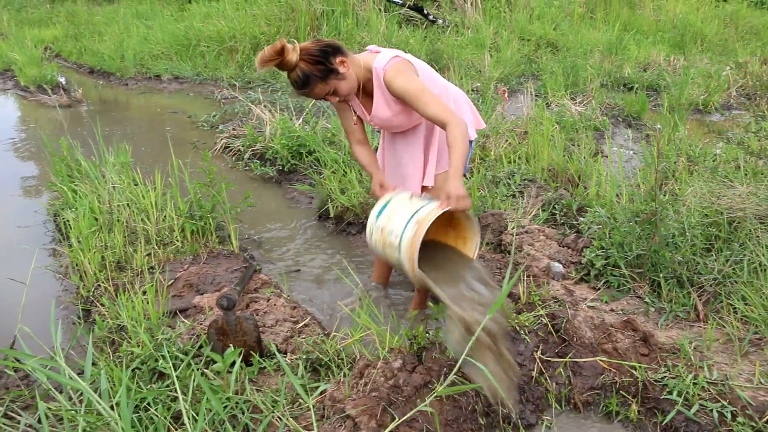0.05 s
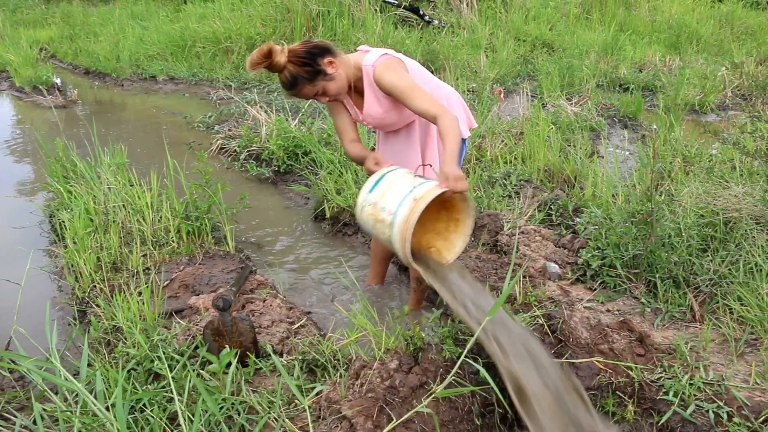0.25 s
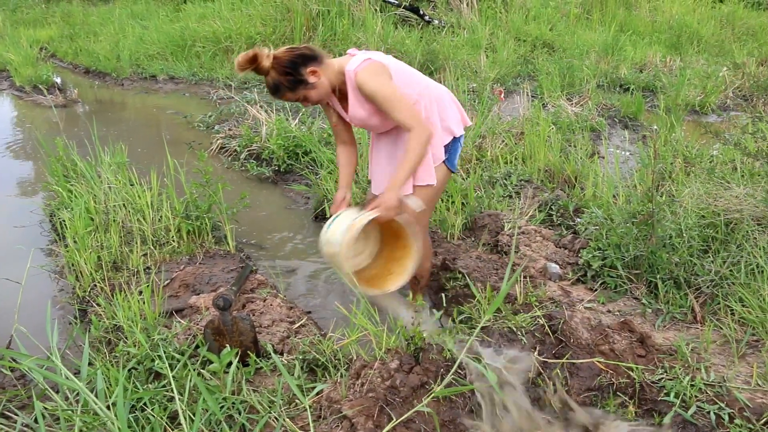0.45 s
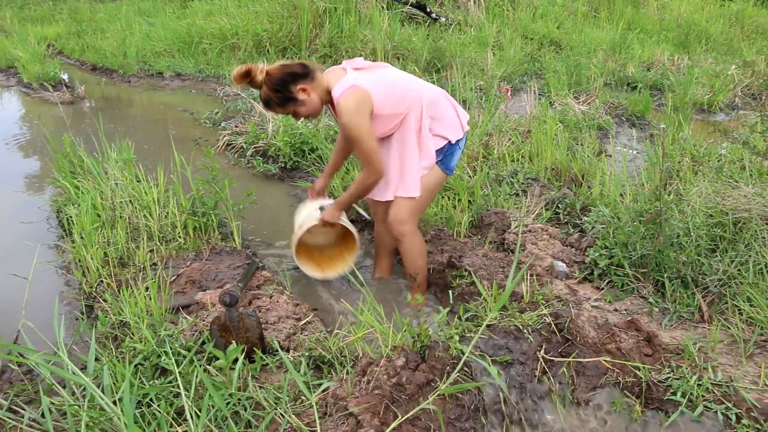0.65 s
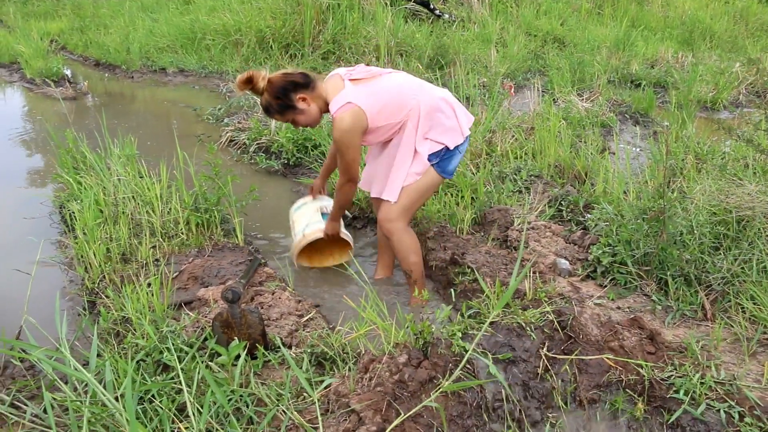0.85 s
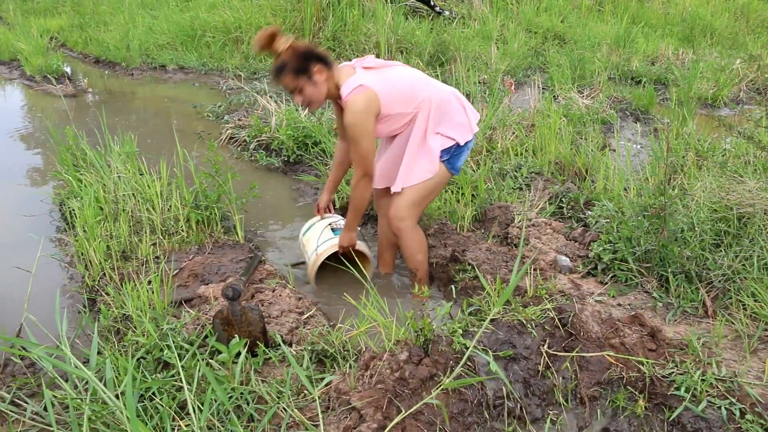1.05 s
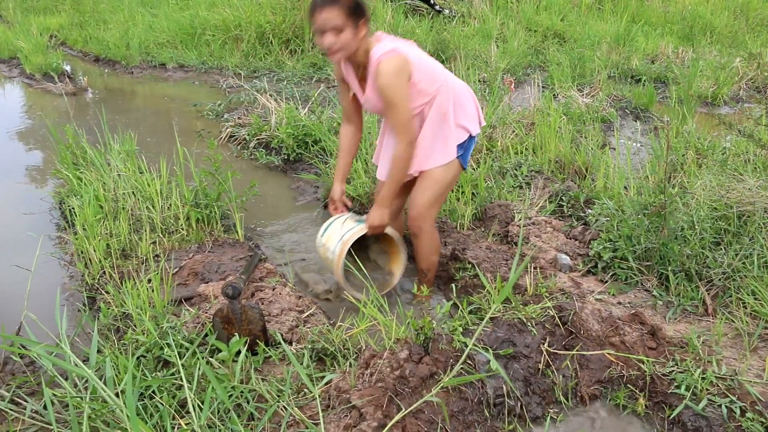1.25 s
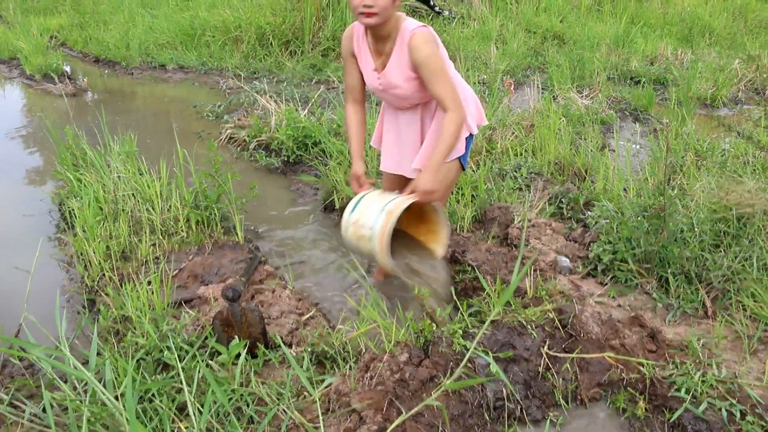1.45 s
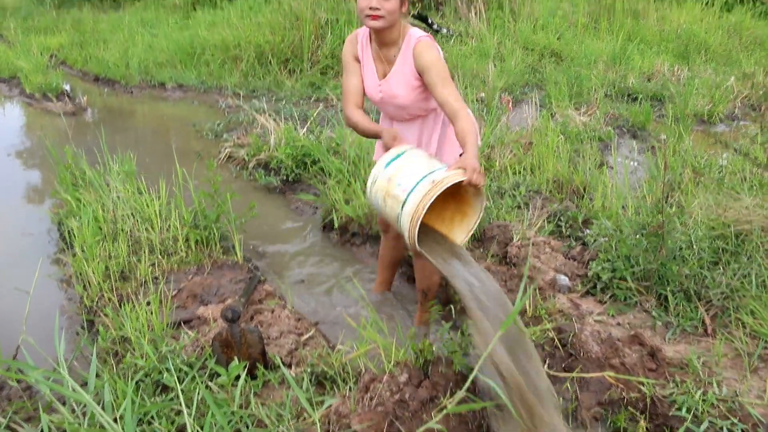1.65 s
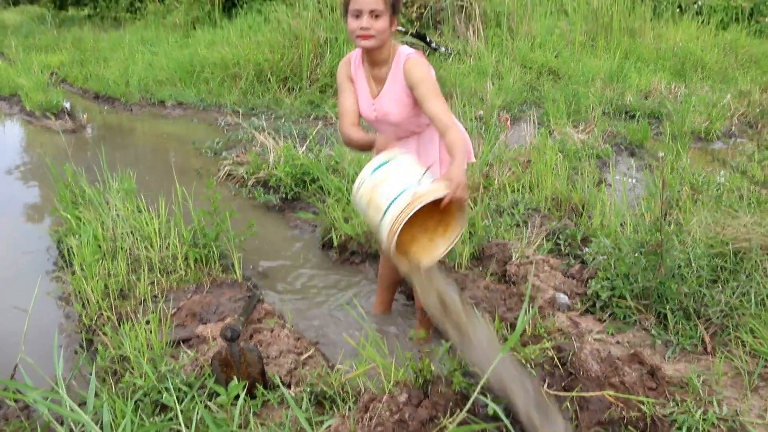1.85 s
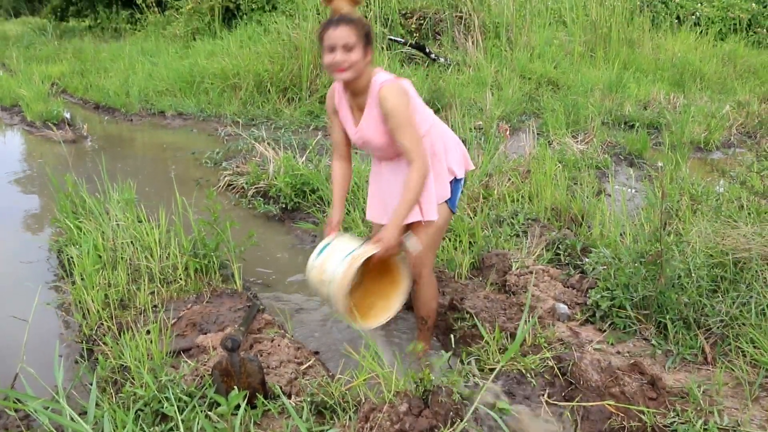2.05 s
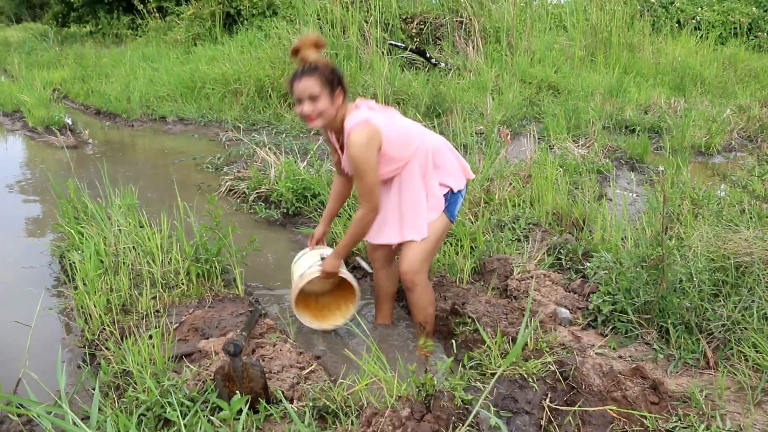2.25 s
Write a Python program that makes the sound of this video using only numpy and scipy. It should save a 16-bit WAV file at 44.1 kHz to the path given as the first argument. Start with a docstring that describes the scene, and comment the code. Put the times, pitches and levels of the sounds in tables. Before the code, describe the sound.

Muddy water thrown from a plastic bucket splatters onto wet mud. The bucket slaps into a shallow pool, gulps full and drips, then a second throw lands. Outdoors, with faint insects and light wind on the microphone.

```python
"""Muddy water, bailed from a shallow pool with a plastic bucket, lands twice on wet mud outdoors.
Each throw is a spatter of drop impacts, with bubbles and heavy plops where trapped air resonates.
Between the throws the bucket slaps into the pool, gulps as it fills and comes up dripping.
Grass and banks scatter the sound; insects sing far off and light wind touches the microphone."""
import sys
import numpy as np
from scipy import signal
from scipy.fft import rfft, irfft, next_fast_len
from scipy.io import wavfile
from scipy.ndimage import uniform_filter1d

SR = 44100
rng = np.random.default_rng(int(sys.argv[2]) if len(sys.argv) > 2 else 0)


def store_pcm(level_fs):
    """Save levels as 16-bit WAV."""
    pcm = np.round(np.clip(level_fs, -1, 1) * 32767).astype(np.int16)
    wavfile.write(sys.argv[1], SR, np.atleast_2d(pcm).T)


N = 105840
T = np.arange(N) / SR
PAN_DB = [[-1.16], [1.16]]   # left, right
PLOP_ATTACK_S = 0.00084


def throws():
    """Impact and bubble resonance: a sheet of water breaks on mud into spatter, churning and spray."""
    # the flow landing, one curve a throw: time_s, spatter_db, churn_db, spray_db
    landings = [
        [(.195, -42, -75, -41.5), (.21, -36.5, -44.5, -39.5), (.26, -30, -39, -39.5), (.33, -27.5, -29, -37),
         (.44, -25, -29, -38.5), (.52, -33, -32.5, -43.5), (.585, -31, -34, -43), (.63, -35.5, -49.5, -43),
         (.72, -39.5, -49, -47), (.85, -48.5, -50.5, -66)],
        [(1.745, -60, -72, -60), (1.756, -26, -56, -34), (1.81, -30.5, -39.5, -41), (1.88, -32, -42.5, -41.5),
         (1.93, -32.5, -39.5, -49), (1.975, -29.5, -31, -36.5), (2.01, -23.5, -31.5, -37),
         (2.05, -32, -31.5, -44.5), (2.11, -31, -34, -43), (2.19, -36, -48.5, -46), (2.28, -44, -54, -47),
         (2.33, -45.5, -63, -75), (2.4, -76, -64, -50)],
    ]
    # spectra of the three parts: frequency_hz, level_db
    spatter_spectrum = [(300, -18), (600, -10.5), (780, -1), (1000, 2.5), (1400, -6.5), (1750, -4.5),
                        (2100, -12), (2700, -6), (3600, -12.5), (5000, -20.5), (7000, -34), (16000, -42)]
    churn_spectrum = [(50, -11), (100, -22), (170, -7), (330, -2), (480, -4), (600, -15), (900, -22),
                      (2000, -46.5)]
    spray_spectrum = [(2000, -20), (4000, 4), (5500, -5.5), (10000, -3.5), (12500, -8.5), (16000, -32.5)]
    deep_hz, full_flow_db = 335, -28   # churning below this pitch needs a heavy flow
    spatter_gain, churn_gain, spray_gain = sum(gains(rows) for rows in landings)
    drops = rms_one(colour(impacts(per_s=1500, spread_db=3.5), spatter_spectrum))
    froth = bubbles(per_s=800, low_hz=649, high_hz=6140, cycles=23.3, spread_db=4.5, rise=0.13)
    froth = rms_one(colour(froth, spatter_spectrum))
    spatter = steady(drops + from_db(-3) * froth, 0.037)
    churn = bubbles(per_s=600, low_hz=81, high_hz=703, cycles=7.9, spread_db=1.5, rise=0.27)
    churn = steady(colour(churn, churn_spectrum), 0.042)
    light_churn = butterworth(churn, 4, deep_hz, "high")
    heaviness = np.minimum(churn_gain / from_db(full_flow_db), 1) ** 2
    churn = steady(heaviness * churn + (1 - heaviness) * light_churn, 0.0274)
    spray = steady(colour(impacts(per_s=2200, spread_db=3.5), spray_spectrum), 0.045)
    return spatter_gain * spatter + churn_gain * churn + spray_gain * spray


def slaps():
    """Impact on water: an impulsive crack, then an exponentially decaying shower of drops and bubbles."""
    # blows of water and bucket: start_s, level_db, attack_s, t60_s, low_hz, high_hz
    blows = [(0, -35, 0.0026, 0.42, 3000, 9900), (.204, -13, 0.0061, 0.066, 835, 3020),
             (0.31, -13.5, 0.0031, 0.056, 200, 3560), (0.3726, -11.5, 0.00089, 0.025, 400, 1410),
             (.433, -15, .005, 0.031, 700, 3000), (0.446, -14, 0.0005, 0.035, 600, 2530),
             (.787, -24.5, 0.0015, 0.065, 704, 4030), (0.8641, -15, 0.00034, 0.033, 617, 6500),
             (.870, -14.5, 0.0031, 0.11, 297, 3760), (1.0006, -18, .00012, 0.015, 884, 4200),
             (1.007, -18.5, 0.0025, 0.14, 483, 3000), (1.136, -26, 0.00044, 0.085, 420, 2935),
             (1.342, -24, 0.00032, 0.078, 1740, 4000), (1.367, -25.5, 0.00093, 0.048, 2200, 8000),
             (1.5158, -31.5, .0005, 0.51, 1780, 7960), (1.638, -31, 0.0038, 0.19, 1300, 4020),
             (1.755, -14, 0.002, 0.048, 500, 2000), (1.984, -12.5, 0.00087, 0.019, 200, 1400),
             (1.988, -7, 0.00025, 0.02, 330, 1470), (2.008, -17.5, 0.00047, 0.019, 700, 4020),
             (2.258, -22, 0.005, 0.11, 2400, 5330)]
    # their common spectrum: frequency_hz, level_db
    spectrum = [(250, -3), (460, 1), (620, -10), (850, 2.5), (1900, -1.5), (2900, -2.5), (4500, -7),
                (6200, -13), (8500, -2), (16000, -23)]
    crack_db, softening_s = 17.5, 0.0027   # a slower attack leaves less of a crack
    out, t = np.zeros(N), T[:SR // 5]
    drops = impacts(per_s=7000, spread_db=2)
    froth = bubbles(per_s=1500, low_hz=711, high_hz=4850, cycles=14.4, spread_db=8.5, rise=0.12)
    shower = steady(drops + from_db(-6) * froth, 0.0035)
    for start_s, level_db, attack_s, t60_s, low_hz, high_hz in blows:
        burst = np.roll(shower, -int(start_s * SR))[:len(t)] * envelope(t, attack_s, t60_s)
        burst[0] -= from_db(crack_db) * np.exp(-attack_s / softening_s)
        burst = butterworth(burst, 2, low_hz, "high")
        burst = butterworth(burst, 2, high_hz, "low")
        add(out, start_s, from_db(level_db) * burst)
    return colour(out, spectrum)


def plops():
    """Bubble resonance: each pocket of air closing in the mud or the pool rings once."""
    # air pockets and drips: start_s, pitch_hz, level_db, t60_s
    pockets = [(.008, 404, -30.5, 0.074), (.318, 335, -13.5, 0.038), (.3735, 810, -10.5, 0.015),
               (.3905, 408, -2.5, 0.014), (.4035, 427, 1.5, 0.021), (.547, 324, -16, 0.038),
               (.562, 870, -17.5, 0.034), (.581, 215, -16.5, 0.026), (.645, 348, -26, 0.065),
               (1.011, 957, -17.5, .06), (1.168, 937, -30, 0.13), (1.293, 1030, -26, 0.033),
               (1.3275, 1910, -16.5, 0.016), (1.344, 1760, -28, 0.026), (1.448, 3460, -28, 0.017),
               (1.5152, 1410, -18.5, .016), (1.606, 774, -24, 0.056), (1.7495, 2280, -8, 0.0085),
               (1.758, 860, -16, 0.035), (1.9835, 388, -2, 0.015), (1.9885, 740, -1.5, 0.011),
               (2.019, 904, -9.5, 0.023), (2.15, 464, -19.5, 0.026)]
    return cavities(pockets, rise_per_s=7.6, attack_s=PLOP_ATTACK_S)


def gurgle():
    """Larger bubbles resonate lower: a quick run of them sinks in pitch as the stream thickens."""
    # the course of the run: time_s, pitch_hz, level_db
    course = [(1.77, 996, -27), (1.815, 898, -22), (1.87, 1003, -30), (1.925, 850, -23.5),
              (1.976, 420, -22)]
    per_s, t60_s, pitch_spread = 190, 0.039, 0.097
    times, pitches, levels = np.transpose(course)
    out = np.zeros(N)
    for time_s in np.arange(times[0], times[-1], 1 / per_s):
        pitch_hz = np.interp(time_s, times, pitches) * np.exp(pitch_spread * rng.standard_normal())
        ring = bubble(pitch_hz, t60_s, rise_per_s=0, attack_s=PLOP_ATTACK_S)
        add(out, time_s + rng.random() / per_s, from_db(np.interp(time_s, times, levels)) * ring)
    return out


def gulps():
    """Cavity resonance: the air in the hollow of the bucket sounds low notes as it fills."""
    # notes of the hollow: start_s, pitch_hz, level_db, t60_s
    notes = [(.868, 148.4, -15, 0.17), (.868, 254.6, -23.5, 0.17), (.935, 154, -29, 0.19),
             (1.008, 148, -27, 0.26), (1.01, 261, -31.5, 0.19), (1.07, 282, -30, 0.13),
             (1.138, 278.3, -30, 0.21), (1.372, 305, -37, 0.18)]
    return cavities(notes, rise_per_s=1.77, attack_s=0.0038)


def bucket_wall():
    """Modal vibration: each knock on the water excites the damped modes of the plastic wall."""
    # knocks: start_s, level_db
    knocks = [(0.8635, -26), (1.001, -45)]
    # wall modes: pitch_hz, mode_db, t60_s
    modes = [(978, -1, 0.25), (1647, 7.5, 0.068), (1800, 8, 0.078), (2020, 7, 0.048), (2320, 5, 0.066),
             (2664, 4.5, 0.05), (2900, 9.5, 0.047)]
    out, t = np.zeros(N), T[:SR // 4]
    for start_s, level_db in knocks:
        for pitch_hz, mode_db, t60_s in modes:
            ring = from_db(level_db + mode_db - 60 * t / t60_s) * np.sin(2 * np.pi * pitch_hz * t)
            add(out, start_s, rng.choice([-1, 1]) * ring)
    return out


def trickle():
    """Air entrainment: runnels falling back into the pool make ringing bubbles and small splashes."""
    # water running off the bucket and sloshing: time_s, level_db
    flow = [(0, -39.5), (.06, -42.5), (.15, -52.5), (.75, -47.5), (.925, -44.5), (.945, -40), (.985, -50),
            (1.04, -40.5), (1.09, -42.5), (1.17, -39), (1.22, -49), (1.31, -40.5), (1.38, -41),
            (1.5, -39.5), (1.53, -41), (1.58, -40), (1.69, -41.5), (1.73, -53.5), (2.4, -47)]
    # spectrum of the drips: frequency_hz, level_db
    spectrum = [(200, -14.5), (330, -4), (580, -9), (950, 0.5), (1250, -8.5), (2600, -7), (3600, -13.5),
                (5500, -18.5), (10000, -15.5), (16000, -54)]
    rings = bubbles(per_s=600, low_hz=341, high_hz=5990, cycles=22.4, spread_db=2.5, rise=0.23)
    rings = rms_one(colour(rings, spectrum))
    patter = rms_one(colour(impacts(per_s=1200, spread_db=1.5), spectrum))
    return gains(flow)[0] * steady(rings + from_db(-4) * patter, 0.22)


def ticks():
    """A brief impact has a broad spectrum: a drop or the rim hitting flat gives a bright, dry snap."""
    # hits on the surface: start_s, level_db
    hits = [(0.669, -26.5), (.788, -32), (0.8646, -21), (0.9996, -41), (1.018, -35), (1.036, -34),
            (1.104, -34), (1.11, -34.5), (1.328, -27), (1.4507, -27.5)]
    # spectrum of a snap: frequency_hz, level_db
    spectrum = [(1000, -6), (3500, 1.5), (9000, 2.5), (16000, -11)]
    t60_s = 0.018
    out, t = np.zeros((2, N)), T[:SR // 10]
    for start_s, level_db in hits:
        snap = stereo_noise(len(t), width=0.38) * from_db(level_db - 60 * t / t60_s)
        for side, sound in zip(out, snap):
            add(side, start_s, sound)
    return colour(out, spectrum) * from_db(PAN_DB)


def outdoors(water, in_the_open):
    """Direct sound plus diffuse scattering: grass and banks give each band a brief tail."""
    # responses of the straight and the scattered path: frequency_hz, gain_db
    direct_path = [(3000, 1), (8000, -2.5)]
    scattered_path = [(500, -13.5), (1000, -15), (2000, -3), (8000, 1.5)]
    left_lag_s, tail_t60_s = 0.00003, 0.066   # the water lies slightly to the right
    # sounds in the open keep their treble and scatter less
    direct = colour(water, direct_path, unit_power=False) + in_the_open
    incident = water + from_db(-6) * in_the_open
    out = np.array([np.interp(T - left_lag_s, T, direct), direct])
    edges_hz = np.geomspace(100, 17000, 15)
    power_decay = from_db(-120 / (tail_t60_s * SR))
    frequency_hz, gain_db = np.transpose(scattered_path)
    for band_hz in zip(edges_hz, edges_hz[1:]):
        power = butterworth(incident, 2, band_hz, "band") ** 2
        tail_power = signal.lfilter([1 - power_decay], [1, -power_decay], power)
        wash = rms_one(butterworth(rng.standard_normal((2, N)), 2, band_hz, "band"))
        band_db = np.interp(np.mean(np.log(band_hz)), np.log(frequency_hz), gain_db)
        out += wash * np.sqrt(tail_power) * from_db(band_db)
    return out * from_db(PAN_DB)


def open_air():
    """Ambient noise: a quiet broadband hush, largely coherent between the two sides."""
    # spectrum of the hush: frequency_hz, level_db
    spectrum = [(60, -7.5), (90, 2), (130, -4.5), (300, -9.5), (600, -14), (950, -22), (1400, -14.5),
                (6000, -28.5), (10000, -24), (16000, -35)]
    return from_db(-49.5) * colour(stereo_noise(N, width=0.3), spectrum) * from_db(PAN_DB)


def insects():
    """Amplitude-modulated narrowband noise: a far chorus merges into one thin, flickering band."""
    pitch_hz, bandwidth_hz = 8320, 250
    swells_per_s, swell_db = 22, 2.5
    resonance = signal.iirpeak(pitch_hz, pitch_hz / bandwidth_hz, fs=SR)
    swell = np.interp(T * swells_per_s, np.arange(N), rng.standard_normal(N))
    chorus = signal.lfilter(*resonance, rng.standard_normal((2, N))) * from_db(swell_db * swell)
    return from_db(-53.5) * rms_one(chorus) * from_db(PAN_DB)


def wind():
    """Turbulent pressure: gusts rumble on the microphone, mostly at its right port."""
    # gusts at the right port: time_s, level_db
    gusts = [(0, -69), (.14, -51), (.195, -36.5), (.29, -34), (.38, -42.5), (.44, -31), (.59, -27.5),
             (.7, -51.5), (1.2, -42), (1.3, -74), (1.85, -51), (1.97, -38.5), (2.04, -45.5), (2.22, -32.5),
             (2.28, -50), (2.35, -30), (2.4, -69)]
    # spectrum of the turbulence: frequency_hz, level_db
    spectrum = [(20, -29), (45, -11.5), (75, -3), (180, -12), (400, -41), (2000, -76)]
    left_db = -16.5
    rumble = np.array([steady(colour(rng.standard_normal(N), spectrum), 0.05) for _ in range(2)])
    return gains(gusts) * rumble * from_db([[left_db], [0]])


def impacts(per_s, spread_db):
    """Shot noise: drops strike at random times, many small and a few large."""
    sizes = from_db(spread_db * np.minimum(rng.exponential(1, N), 4)) * rng.choice([-1, 1], N)
    return rms_one(sizes * (rng.random(N) < per_s / SR))


def bubble(pitch_hz, t60_s, rise_per_s, attack_s):
    """A damped oscillator: trapped air rings, its pitch gaining the fraction rise_per_s each second."""
    t = np.arange(int(t60_s * SR) + 2) / SR
    return np.sin(2 * np.pi * pitch_hz * t * (1 + rise_per_s * t / 2)) * envelope(t, attack_s, t60_s)


def bubbles(per_s, low_hz, high_hz, cycles, spread_db, rise):
    """A constant-Q cloud: over `cycles` periods a bubble dies by 60 dB and rises by the share `rise`."""
    out, draws = np.zeros(N), rng.random((8000, 4))
    for when, pitch, size, sign in draws[:int(per_s * N / SR)]:
        pitch_hz = low_hz * (high_hz / low_hz) ** pitch
        level_db = spread_db * min(-np.log(1 - size), 3)
        strength = pitch_hz * from_db(level_db) * np.sign(sign - .5)   # keeps the spectrum even
        ring = bubble(pitch_hz, cycles / pitch_hz, rise * pitch_hz / cycles, .5 / pitch_hz)
        add(out, when * N / SR, strength * ring)
    return rms_one(out)


def cavities(rows, rise_per_s, attack_s):
    """Free oscillation of large air pockets, one for each row."""
    out = np.zeros(N)
    for start_s, pitch_hz, level_db, t60_s in rows:
        add(out, start_s, from_db(level_db) * bubble(pitch_hz, t60_s, rise_per_s, attack_s))
    return out


def envelope(t, attack_s, t60_s):
    """Exponential onset and a decay of 60 dB in t60_s."""
    return (1 - np.exp(-t / attack_s)) * from_db(-60 * t / t60_s)


def stereo_noise(count, width):
    """Partly coherent noise: width weighs each side's own part against the shared part."""
    return rng.standard_normal(count) + width * rng.standard_normal((2, count))


def colour(x, spectrum, unit_power=True):
    """Minimum-phase filter with the given spectrum, made causal by folding the cepstrum."""
    size = next_fast_len(N + SR // 4)
    size += size % 2
    frequency_hz, level_db = np.transpose(spectrum)
    bins_hz = np.arange(size // 2 + 1) * SR / size
    gain = from_db(np.interp(np.log(bins_hz + 1), np.log(frequency_hz), level_db))
    cepstrum = irfft(np.log(rms_one(gain) if unit_power else gain))
    cepstrum[1:size // 2] *= 2
    cepstrum[size // 2 + 1:] = 0
    return irfft(rfft(x, size) * np.exp(rfft(cepstrum)))[..., :N]


def butterworth(x, order, edge_hz, kind):
    """Filter with a maximally flat passband."""
    return signal.sosfilt(signal.butter(order, edge_hz, kind, fs=SR, output="sos"), x)


def gains(rows):
    """Level columns of a curve as gains in time, silent outside it."""
    times, *columns = np.transpose(rows)
    sounding = (T >= times[0]) * (T <= times[-1])
    return np.array([from_db(np.interp(T, times, levels)) * sounding for levels in columns])


def steady(x, window_s):
    """Hold a signal at unit rms over a sliding window."""
    power = uniform_filter1d(x ** 2, max(int(window_s * SR), 2))
    return x / np.sqrt(np.abs(power) + 1e-9)


def rms_one(x):
    """Scale to unit rms."""
    return x / np.sqrt(np.mean(x ** 2) + 1e-20)


def from_db(db):
    """Decibels to amplitude ratio."""
    return 10 ** (np.asarray(db) / 20)


def add(out, start_s, sound):
    """Superpose a sound from start_s on."""
    i = int(np.clip(start_s * SR, 0, N))
    out[i:i + len(sound)] += sound[:N - i]


def scene():
    """Superposition of the water, the bucket and their surroundings."""
    water = throws() + gurgle() + trickle() + bucket_wall() + plops() + gulps()
    return outdoors(water, in_the_open=slaps()) + ticks() + open_air() + insects() + wind()


def record(dry):
    """Clipping at full scale, then a steep low-pass."""
    cutoff_hz = 16000
    low_pass = signal.ellip(10, .1, 80, cutoff_hz, fs=SR, output="sos")
    return signal.sosfilt(low_pass, np.clip(dry, -1, 1))


dry = scene()
out = record(dry)
store_pcm(out)
```